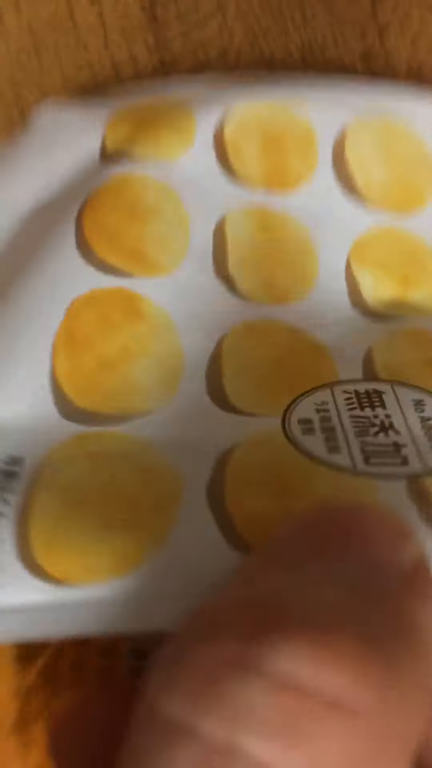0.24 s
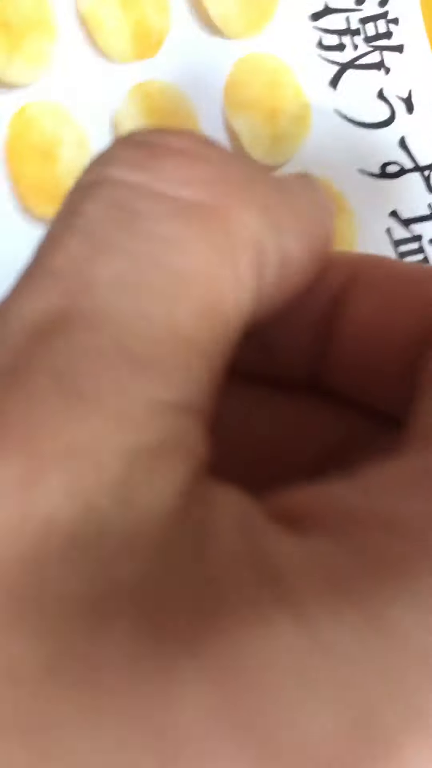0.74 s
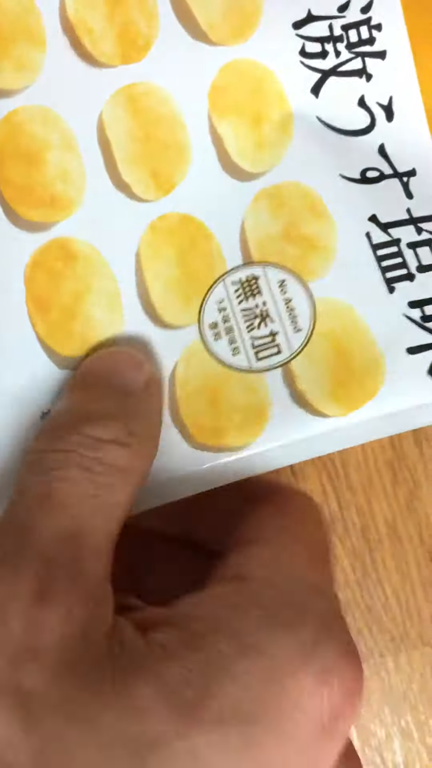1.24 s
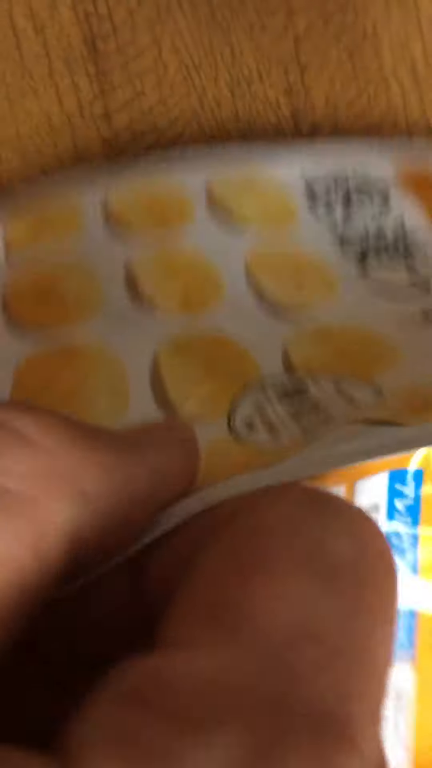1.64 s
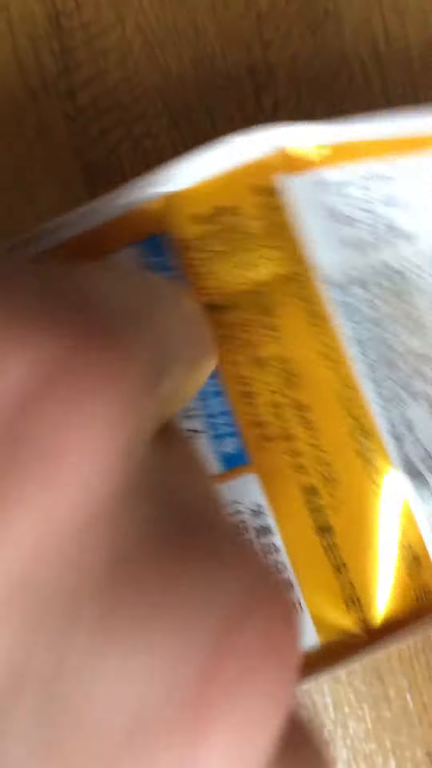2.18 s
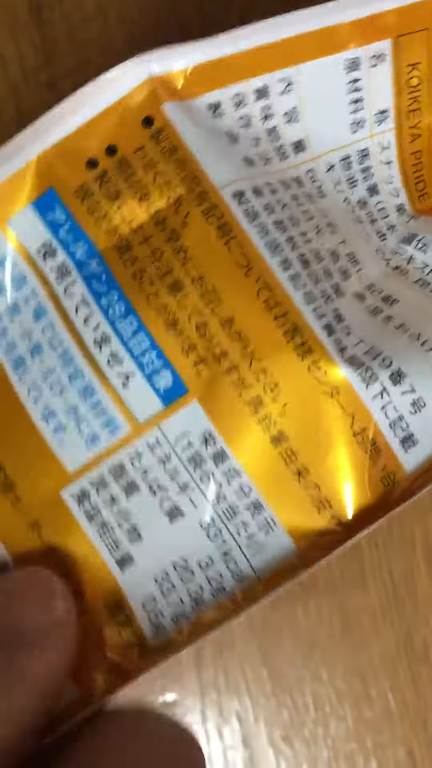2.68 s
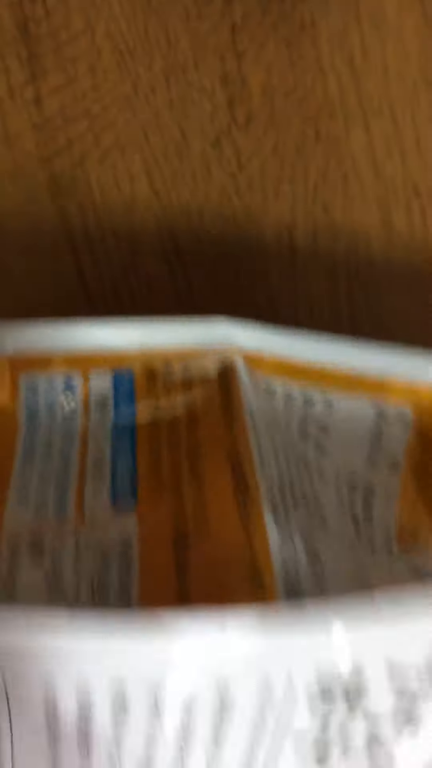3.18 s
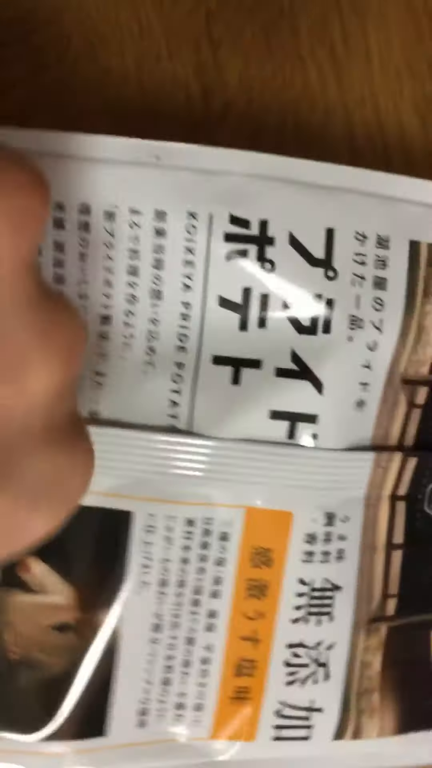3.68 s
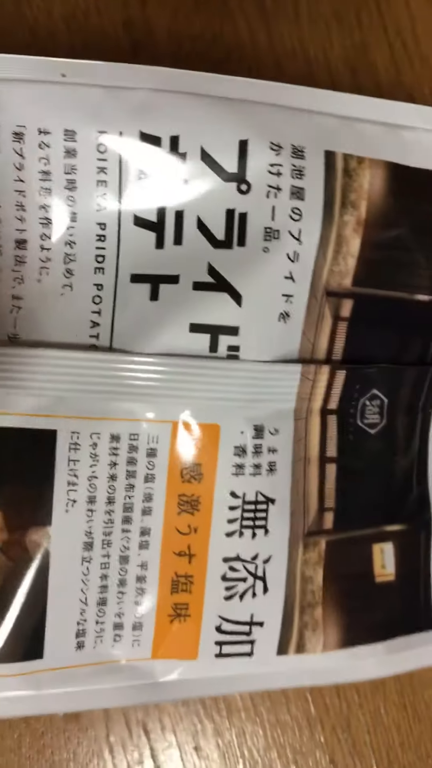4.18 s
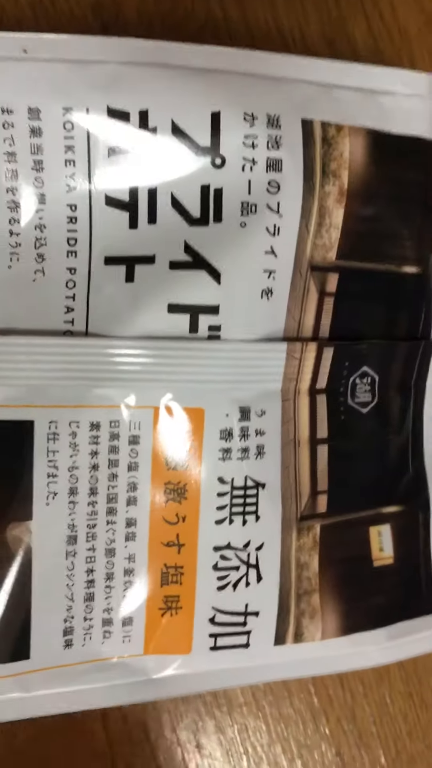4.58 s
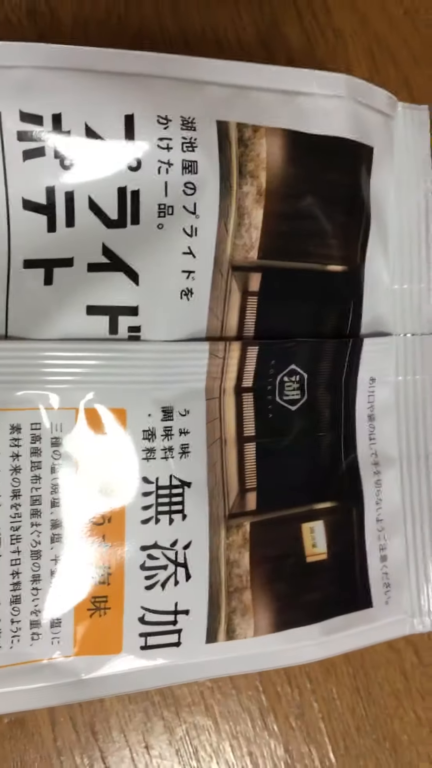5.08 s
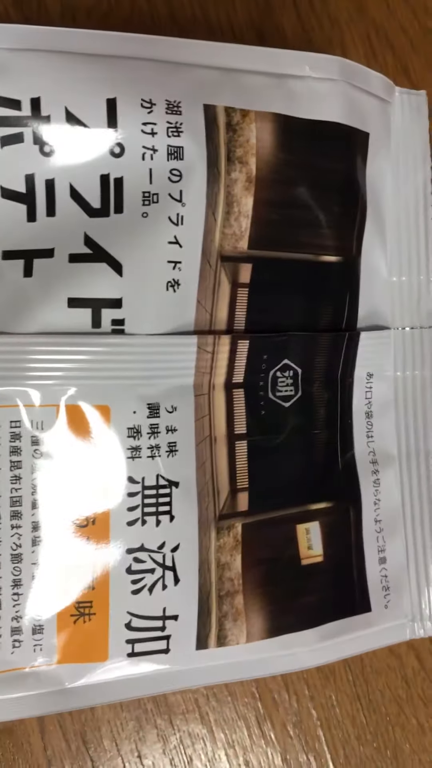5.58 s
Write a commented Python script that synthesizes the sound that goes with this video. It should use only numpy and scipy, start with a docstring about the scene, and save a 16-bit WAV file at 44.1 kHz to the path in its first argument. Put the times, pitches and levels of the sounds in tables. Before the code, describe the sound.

In a small, quiet room, a refrigerator-like hum runs faintly while a plastic snack bag is handled close to the microphone. It crackles briefly, stops for a moment, then rustles and snaps unevenly for about three seconds as it is turned, with a slightly hollow flutter from the air inside. The crinkling ends, and a fingertip barely brushes the plastic three times over the hum.

```python
"""A motor, probably a refrigerator, hums in a small quiet room from start to end.
Almost at once, hands shift a plastic snack bag on a wooden table, close by, then pause near 1 s.
From 1.2 s they shift and turn it again: the film hisses as it slides, its creases snap through,
and its air-filled walls flutter and puff. After about 4.4 s the hands rest, and a fingertip
brushes the film faintly three times."""
import sys
import numpy as np
from scipy import signal
from scipy.fft import rfft, irfft, next_fast_len
from scipy.io import wavfile
from scipy.ndimage import uniform_filter1d

SR = 44100
rng = np.random.default_rng(int(sys.argv[2]) if len(sys.argv) > 2 else 0)


def wav_record(signal):
    """Record a signal, one row per channel, as 16-bit PCM in the file named by sys.argv[1]."""
    frames = np.transpose(np.atleast_2d(signal))
    bounded = np.clip(frames, -1, 1)
    # unit amplitude maps onto the largest positive 16-bit level
    quanta = np.round(bounded * 32767).astype(np.int16)
    wavfile.write(sys.argv[1], SR, quanta)


N = 257103
TIME = np.arange(N) / SR
FIRM_ATTACK_S, GENTLE_ATTACK_S = .011, .05  # a firm touch takes hold quickly, a gentle one creeps in
# the dull sound of rubbed plastic film: f/Hz, level/dB
RUB_SPECTRUM = [(150, -18.5), (300, -10), (500, -4), (850, 0.5), (1200, -0.5), (1650, 0.5), (2300, -13.5),
                (3300, -8), (4600, -16), (9000, -31), (16000, -36.5)]


def amp(db):
    """Turns decibels into a factor to multiply by."""
    return 10 ** (np.asarray(db) / 20)


def unit(x):
    """Scales x to an average size (rms) of 1."""
    return x / np.sqrt(np.mean(x ** 2) + 1e-20)


def look_up(points, hz):
    """Reads between a table's rows, on a log-frequency axis."""
    f, value = np.transpose(points)
    return np.interp(np.log(hz + 1), np.log(f + 1), value)


def add(mix, start_s, sound):
    """Mixes a sound in at the given time."""
    part = mix[max(round(start_s * SR), 0):][:len(sound)]
    part += sound[:len(part)]


def colour(x, spectrum):
    """Shapes the lows and highs of x by a table; the result has rms 1."""
    size = next_fast_len(len(x))
    gain = amp(look_up(spectrum, np.fft.rfftfreq(size, 1 / SR)))
    return unit(irfft(rfft(x, size) * gain, size)[:len(x)])


def causal(gain):
    """Makes a filter with this gain that starts sharply and rings afterwards."""
    log_gain = np.log(np.maximum(np.r_[gain, gain[-2:0:-1]], 1e-5))
    return np.exp(np.conj(signal.hilbert(log_gain)))[:len(gain)]


def wander(per_s):
    """A random curve of rms 1 that heads for a new value per_s times a second."""
    return unit(np.interp(TIME * per_s, np.arange(N), rng.standard_normal(N)))


def motor_hum(air_db=-63, waver_db=-.43):
    """Tones from the motor and the mains power beat slowly over a faint hiss."""
    # the hum's tones: f/Hz, level/dB
    tones = [(58.8, -53), (117.6, -63), (120, -65), (176.4, -78), (235.2, -78.5), (283, -75.5),
             (294, -72.5), (352.8, -79), (411.6, -78.5), (470.4, -85), (565, -80.5), (588, -80),
             (940.8, -84), (1319, -86), (1352, -87), (2470, -89), (2588, -88)]
    # the room's hiss: f/Hz, level/dB
    air_spectrum = [(20, -21), (36, 3.5), (70, 2), (140, 3.5), (200, -2.5), (350, -4), (520, -15),
                    (950, -15.5), (1700, -20.5), (3000, -21.5), (4800, -27.5), (6300, -24), (8000, -27),
                    (14500, -21.5)]
    hum = np.zeros(N)
    for hz, db in tones:
        gain = amp(db + waver_db * wander(per_s=4))
        hum += gain * np.sin(2 * np.pi * (hz * TIME + rng.random()))
    return np.sqrt(2) * hum + amp(air_db) * colour(rng.standard_normal(N), air_spectrum)


def room(x, tail_db=-17, onset_s=.0036, size=22050):
    """The small room adds a few quick echoes and a short, weak tail."""
    # how long the room rings: f/Hz, time to fall 60 dB/s
    ring_times = [(150, 0.19), (1000, 0.26), (4000, 0.25), (15000, .24)]
    # echoes from the table and things nearby: delay/s, level/dB
    echoes = [(.0024, -22.5), (.0073, -26.5), (.0087, -31.5), (0.0175, -36.5)]
    hz, t, bands = signal.stft(rng.standard_normal(size), SR, nperseg=256)
    decay = amp(-60 * t / look_up(ring_times, hz)[:, None]) * (1 - np.exp(-t / onset_s))
    tail = signal.istft(bands * decay, SR, nperseg=256)[1]
    response = amp(tail_db) * tail / np.linalg.norm(tail)
    for delay, db in echoes:
        add(response, delay, amp(db) * np.array([.25, .5, .25]))  # echoes come back duller
    return x + signal.fftconvolve(x, response)[:N]


def brushes():
    """A resting fingertip barely moves on the film."""
    # faint strokes: t/s, length/s, level/dB
    strokes = [(4.66, 0.078, -71), (5.66, .07, -66.5), (5.786, 0.074, -63.5)]
    out = np.zeros(N)
    for start, length, db in strokes:
        swell = np.hanning(int(length * SR))
        add(out, start, amp(db) * swell * colour(rng.standard_normal(N), RUB_SPECTRUM)[:len(swell)])
    return out


def contact(release_s=.025, waver_db=1.5):
    """How strongly the fingers graze the film, unevenly, while they move the bag."""
    # times when the hands move: start/s, end/s, level/dB
    grips = [(0, .83, -61), (1.178, 2.45, -54), (2.575, 4.33, -56)]
    held = np.zeros(N)
    for start, end, db in grips:
        rise = np.clip((TIME - start) / FIRM_ATTACK_S, 0, 1)
        held += rise * amp(db - 20 * np.maximum(TIME - end, 0) / release_s)
    return held * amp(waver_db * wander(per_s=25))


def slide_force(length, release_s, db, tail_s=.4, sag_db_per_s=12):
    """The force of one slide builds, sags a little, then lets go."""
    t = np.arange(int((length + tail_s) * SR)) / SR
    attack_s = np.interp(db, [-58, -38], [GENTLE_ATTACK_S, FIRM_ATTACK_S])
    sag_db = sag_db_per_s * (np.minimum(t, length) - length / 2)
    release_db = 20 * np.maximum(t - length, 0) / release_s
    return np.minimum(t / min(attack_s, length), 1) * amp(db - sag_db - release_db)


def handling(contact_fizz_db=-3, wall_db=-26, wall_waver_db=2):
    """Strength of rub, fizz and wall flutter over time: slides add to the light contact."""
    # slides under the fingers: t/s, length/s, time to fall 20 dB/s, level/dB, relative fizz/dB
    slides = [(.075, .08, .05, -63, 12.5), (.152, .118, .08, -43.5, -3), (.335, .12, .12, -52.5, 1),
              (.555, .03, .03, -48, -7), (.583, .016, .03, -34.5, -19), (.607, .02, .05, -34, 2.5),
              (.64, .028, .03, -44, -5), (.669, .019, .028, -13, -5.5), (.691, .01, .035, -21.5, -6),
              (.71, .05, .12, -40, -4.5), (.908, .02, .022, -57, -1), (1.23, .08, .1, -46, -3),
              (1.315, .025, .12, -37.5, -7), (1.425, .085, .06, -58, 14.5), (1.77, .016, .05, -35, -11),
              (1.772, .21, .13, -37, -5.5), (2.085, .06, .1, -57, 8), (2.17, .1, .11, -43.5, -11),
              (2.705, .025, .05, -33.5, -1.5), (2.757, .03, .15, -37.5, -5.5),
              (2.84, .045, .045, -37.5, -3.5), (3.122, .115, .05, -33.5, -5.5),
              (3.255, .088, .07, -48.5, -4), (3.372, .068, .09, -48.5, -3), (3.465, .029, .12, -45.5, -6),
              (3.578, .134, .065, -44, -2), (3.785, .025, .04, -52, -6), (3.98, .035, .06, -45.5, -7),
              (4.066, .022, .04, -38.5, -10), (4.13, .07, .07, -49.5, -4), (4.343, .022, .015, -46.5, -7)]
    rub_power = contact() ** 2
    fizz_power = rub_power * amp(contact_fizz_db) ** 2
    for start, length, release_s, db, fizz_db in slides:
        force = slide_force(length, release_s, db)
        add(rub_power, start, force ** 2)
        add(fizz_power, start, (amp(fizz_db) * force) ** 2)
    rub = np.sqrt(rub_power)
    wall = amp(wall_db + wall_waver_db * wander(per_s=30)) * np.sqrt(rub)  # follows the rubbing
    return rub, np.sqrt(fizz_power), wall


def puff(hz, decay_s, size=4096):
    """The air in the bag gives a low push that takes a moment to build and dies quickly."""
    t = np.arange(size) / SR
    return np.sin(2 * np.pi * hz * t) * np.exp(-t / decay_s) * (1 - np.exp(-2 * hz * t))


def flutter(wall, push_db=-1, shake_db=-11.5, shake_s=.017, max_swing_db=-30):
    """The bag's slack wall trembles and pumps air; pressed harder, it flops over and shakes."""
    # the wall's low rumble: f/Hz, level/dB
    wall_spectrum = [(20, -38), (45, -17.5), (75, -0.5), (110, 0), (160, -1.5), (230, -4), (330, -11.5),
                     (500, -22.5), (1200, -51.5)]
    # flops of the wall: t/s, level/dB, f/Hz, decay/s
    flops = [(.25, -31, 230, .012), (.31, -26, 160, .012), (.385, -33, 170, .01), (.5827, -21.5, 270, .008),
             (.61, -22, 100, .013), (.618, -24, 230, .01), (.681, -9.5, 135.3, .0069),
             (.6859, -12, 260, .006), (.78, -33, 120, .016), (1.19, -33, 150, .01), (1.24, -29, 130, .016),
             (1.26, -28, 220, .012), (1.322, -29, 170, .012), (1.535, -32, 100, .025),
             (1.575, -28, 190, .008), (2.226, -26, 99, .014), (2.252, -25, 150, .012),
             (2.588, -26, 250, .009), (2.613, -16.5, 92, .019), (2.63, -26, 210, .012),
             (2.956, -26, 170, .014), (3.08, -30, 140, .016), (3.132, -28, 105, .012),
             (3.14, -26, 230, .012), (3.385, -32, 115, .01), (3.535, -36, 130, .012),
             (4.0706, -21, 170, .007)]
    waves = signal.hilbert(colour(rng.standard_normal(N), wall_spectrum), next_fast_len(N))[:N]
    # even out the rumble so that its swing follows the hands
    steady = waves.real / np.sqrt(uniform_filter1d(abs(waves) ** 2, size=900))
    swing, pushes = wall.copy(), np.zeros(N)
    t = np.arange(4096) / SR
    for start, db, hz, decay_s in flops:
        add(pushes, start, amp(db + push_db) * puff(hz, decay_s))
        add(swing, start, amp(db + shake_db) * np.exp(-t / shake_s) * (1 - np.exp(-2 * hz * t)))
    return pushes + np.minimum(swing, amp(max_swing_db)) * unit(steady)


def hollow_ring(x):
    """The hollow bag rings on faintly after whatever shakes it."""
    # notes of the air-filled bag: f/Hz, width/Hz, level/dB
    notes = [(271, 35, -6.5), (820, 10, -8.5), (1634, 12, -12.5), (2250, 34, -12.5)]
    return x + sum(amp(db) * signal.lfilter(*signal.iirpeak(hz, hz / width, fs=SR), x)
                   for hz, width, db in notes)


def glance(x, delay_s=.0005, drift=.45, echo_db=-13):
    """Sound bounces off the table; the path changes as the bag moves, so the tone shifts."""
    delay = delay_s * np.exp(drift * wander(per_s=7))
    return x + amp(echo_db) * np.interp(TIME - delay, TIME, x)


def slips(per_s, spread_db):
    """The film sticks and slips in tiny clicks, mostly small and a few large."""
    place, sign, chance = rng.spawn(1)[0].random((int(per_s * N / SR), 3)).T
    size = amp(spread_db * np.minimum(-np.log(1 - chance), 4))
    return np.bincount((place * N).astype(int), size * np.sign(sign - .5), N)


def flex(x, patchy_db=3):
    """As the film bends, the pitches it favours drift."""
    bands = signal.stft(x, nperseg=512, noverlap=384)[2]
    patches = uniform_filter1d(rng.standard_normal(bands.shape), size=5, axis=0)  # smooth over pitch
    patches = unit(uniform_filter1d(patches, size=16, axis=1))  # and over time
    return unit(signal.istft(bands * amp(patchy_db * patches), nperseg=512, noverlap=384)[1][:N])


def sliding(rub, fizz, rub_db=-2, rasp_db=-2, fizz_db=-1.8, judder_db=2.45, swipe_db=-17):
    """Countless slips blur into a hiss; hard swipes rasp more than they rub, and the grip judders."""
    # the film's rough rasp: f/Hz, level/dB
    rasp_spectrum = [(700, -26), (1400, -5.5), (1800, -2), (2300, 0), (3200, -2), (4800, -10.5),
                     (6000, -5.5), (8000, -17.5), (16000, -29.5)]
    # its fine, high fizz: f/Hz, level/dB
    fizz_spectrum = [(1500, -22.5), (4000, -2), (6400, 1.5), (8000, -1), (9400, 4), (10500, -3),
                     (12000, 4.5), (15700, -2), (17000, -13)]
    judder = amp(judder_db * wander(per_s=290))
    capped_rub = rub / (1 + rub / amp(swipe_db))
    body = flex(colour(slips(per_s=5000, spread_db=2.5), RUB_SPECTRUM)) * capped_rub
    rasp = flex(colour(slips(per_s=4100, spread_db=1.5), rasp_spectrum)) * np.sqrt(rub * fizz)
    hiss = flex(colour(slips(per_s=12000, spread_db=3), fizz_spectrum), patchy_db=2.5) * fizz
    return glance(judder * (amp(rub_db) * body + amp(rasp_db) * rasp + amp(fizz_db) * hiss))


def crease(hz, upper_hz, upper_db, crack_db, q, flip_s=.0006, crack_hz=5000, ring_s=.0041, ring_db=-15):
    """A patch of film flips: a burst at two broad pitches (purer with higher q), then a short ring."""
    size = 2048
    t, f = np.arange(size) / SR, np.fft.rfftfreq(size, 1 / SR) + 1
    fade = np.exp(-t / flip_s) + amp(ring_db) * np.exp(-t / ring_s)
    burst = rfft(rng.standard_normal(size) * fade)
    burst /= np.sqrt(uniform_filter1d(abs(burst) ** 2, size=36))  # the flip drives all pitches alike
    lower, upper = (1 / (1 + (q * (f / peak - peak / f)) ** 2) for peak in (hz, upper_hz))
    crack = amp(crack_db) * f ** 2 / (f ** 2 + crack_hz ** 2)
    gain = np.sqrt(lower ** 2 + (amp(upper_db) * upper) ** 2 + crack ** 2)
    return irfft(burst * causal(gain))[:size // 2]


def crackle(motion, gain_db, per_s, low_hz, high_hz, spread_db, max_motion_db=-42, pitches=14):
    """Small wrinkles give way while the film moves, each ticking at its own pitch."""
    out = np.zeros(N)
    for hz in np.geomspace(low_hz, high_hz, pitches):
        clicks = slips(per_s / pitches, spread_db) * np.minimum(motion, amp(max_motion_db))
        tick = crease(hz, upper_hz=hz, upper_db=-7, crack_db=-30.5, q=2.37)
        out += signal.oaconvolve(clicks, tick)[:N]
    return amp(gain_db) * out


def snaps(puff_db=-43.5, puff_hz=260):
    """Big creases snap through, each shaking the bag's air a little."""
    # snapping creases: t/s, level/dB, lower pitch/Hz, relative upper pitch level/dB, relative crack/dB
    creases = [(.248, 3.5, 1115, -8.5, -33), (.2526, 7.5, 740, -8, -30), (.2972, 13, 710, .5, -4),
               (.306, 9, 860, -6.5, -30), (.3386, -13, 1400, 1.5, -10), (.36, -15, 2000, 4, -8),
               (.3784, 3, 660, 3, -13), (.3933, -14, 452, -1, 3), (.4125, -16, 800, 0, 4.5),
               (.5513, -7, 1000, -2, -9.5), (.8708, -25, 700, -4, 1), (1.1899, 4.5, 900, -11.5, -27),
               (1.1969, 0, 800, -2, -32), (1.2197, 4, 710, -10, -25), (1.2332, -1, 520, 5.5, -4.5),
               (1.2378, 9.5, 580, -12, -30), (1.2643, 4.5, 750, -2, -20.5), (1.2852, 7.5, 900, 2.5, .5),
               (1.2981, 8, 980, -4, -6), (1.3203, 8.5, 690, -.5, -2), (1.4503, -2.5, 600, 5.5, -17),
               (1.5358, .5, 980, 2.5, -15), (1.5743, 6, 980, -5, -43), (1.6883, -3.5, 620, -1.5, -18),
               (1.704, 1.5, 520, 2.5, -9), (1.7874, 13, 1490, -30, -38), (2.014, -15, 700, 14, 1),
               (2.0337, -5.5, 630, 5.5, -21), (2.051, -10, 2200, -3, -22), (2.0755, 14, 2350, -30, -44),
               (2.1012, 4, 500, 10, -5.5), (2.1215, -4.5, 1250, -2, -23), (2.1613, 2.5, 1350, 1.5, -38),
               (2.189, -7, 1480, -2, -20), (2.2237, -7, 540, 10, -12.5), (2.257, -1, 530, 6, -27),
               (2.3235, -14, 530, 12, -1), (2.5671, -5, 700, -2, -16), (2.5871, 5, 820, 10.5, 4.5),
               (2.6045, 6.5, 560, 3.5, -9.5), (2.6211, 6, 640, -1, -34), (2.644, 9.5, 790, 2.5, -13),
               (2.7102, 4, 480, 8.5, -5), (2.7169, 12.5, 560, .5, -8.5), (2.7235, 7.5, 547, 2, -9),
               (2.7315, 6, 800, 1.5, -5), (2.7523, -4, 4000, 12, 9), (2.781, -15, 3400, 6, -2),
               (2.7925, -10, 600, 5, 10.5), (2.8412, -7.5, 950, 5.5, .5), (2.855, -2.5, 790, 2.5, -5),
               (2.8745, 4, 580, -1, -13), (2.9452, -11, 759, -7.5, -4.5), (2.9533, 12.5, 690, -7.5, -32),
               (3.0008, -3.5, 510, 8.5, -30), (3.0241, 6.5, 990, -1.5, -28), (3.0492, 13, 1480, 1, -1.5),
               (3.0846, 2, 590, 2.5, -11), (3.1373, 9.5, 1100, -6, -29), (3.1743, 9.5, 1400, 2, -8),
               (3.2357, 1, 950, -.5, -16), (3.3249, -18, 520, 2, 5.5), (3.3864, 1, 920, 2, -32),
               (3.4069, -6, 950, 1, -11), (3.6525, 3.5, 780, -2, -22), (3.695, -10.5, 750, -5, 3),
               (3.8822, -8, 760, 3, 2.5), (3.9237, -7.5, 1000, 1.5, -8.5), (3.9342, -1.5, 830, -1.5, -11),
               (3.986, 6.5, 900, -4, -12), (3.9957, 10.5, 670, -12, -32), (4.0142, 2.5, 980, -8, -27.5),
               (4.03, 2, 900, 4, -4.5), (4.05, -5.5, 1040, -3.5, -19), (4.0694, 17, 670, 0, -8.5),
               (4.074, 7.5, 760, -2, -12.5), (4.0926, 10, 530, -1, -24), (4.1403, -8.5, 2000, -7, -16),
               (4.2504, -18, 720, 11, -.5), (4.3225, -15, 2400, -9, -20)]
    out = np.zeros(N)
    for start, db, hz, upper_db, crack_db in creases:
        flip_s = np.interp(crack_db, [-25, 3], [.0017, .0004])  # a sharper crack is a quicker flip
        upper_hz = hz * np.interp(crack_db, [-27, -8], [2.5, 3.5])
        q = np.interp(upper_db, [-28, -10], [2.4, 1.15])  # one pitch alone rings more purely
        add(out, start, amp(db) * crease(hz, upper_hz, upper_db, crack_db, q, flip_s))
        add(out, start, amp(db + puff_db) * puff(puff_hz * 2 ** rng.uniform(-.5, .46), decay_s=.006))
    return out


def scene():
    """The bag in the room, over the hum."""
    rub, fizz, wall = handling()
    wrinkles = crackle(rub, gain_db=21.5, per_s=82, low_hz=1190, high_hz=4530, spread_db=1.2)
    ticks = crackle(fizz, gain_db=20, per_s=90, low_hz=5500, high_hz=14500, spread_db=1.3)
    film = snaps() + sliding(rub, fizz) + wrinkles + ticks + brushes()
    bag = hollow_ring(film) + flutter(wall)
    return (room(bag) + motor_hum())[None]


def record(dry, cutoff_hz=16100):
    """Clips any peak beyond full scale, then removes the highest treble."""
    low_pass = signal.firwin(161, cutoff_hz, window=("kaiser", 8), fs=SR)
    return signal.oaconvolve(np.clip(dry, -1, 1), low_pass[None], "same")


dry = scene()
out = record(dry)
wav_record(out)
```